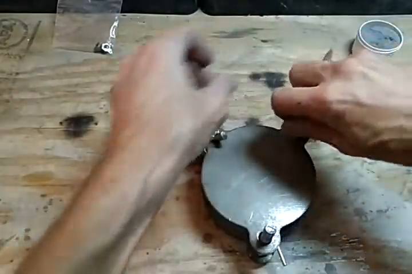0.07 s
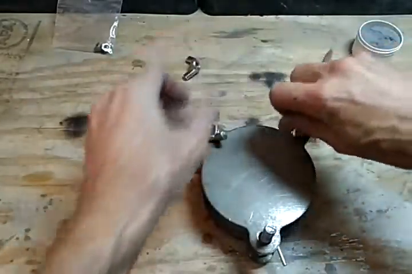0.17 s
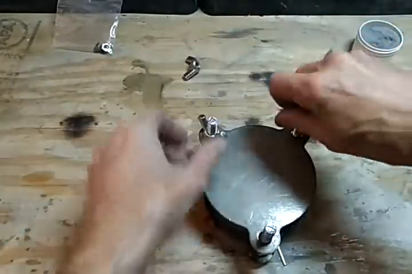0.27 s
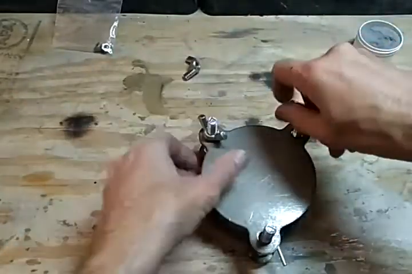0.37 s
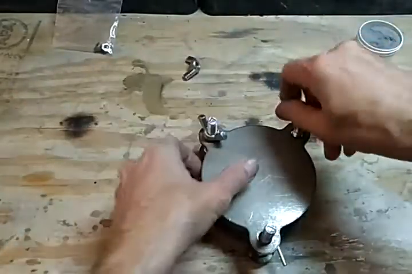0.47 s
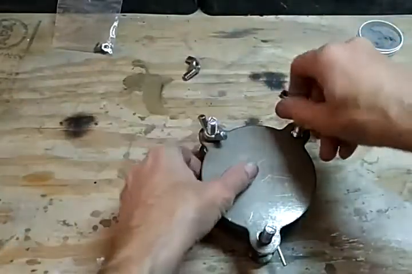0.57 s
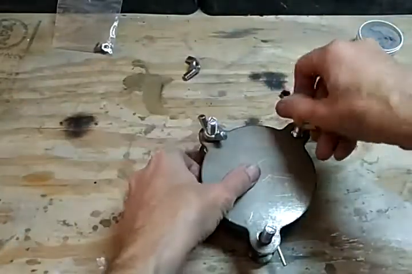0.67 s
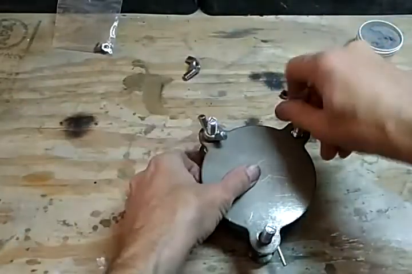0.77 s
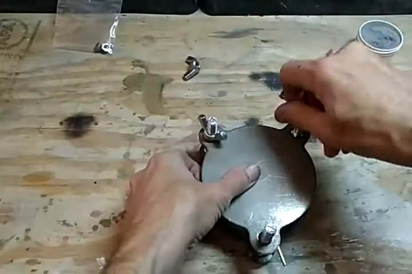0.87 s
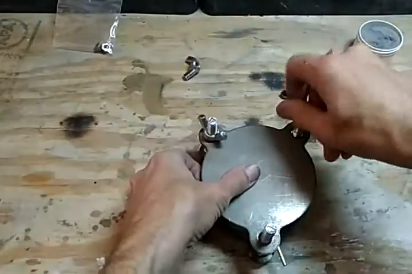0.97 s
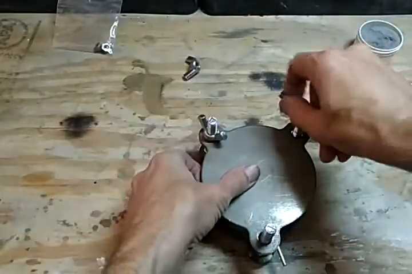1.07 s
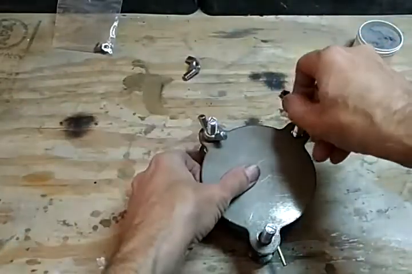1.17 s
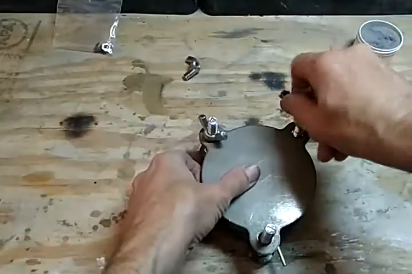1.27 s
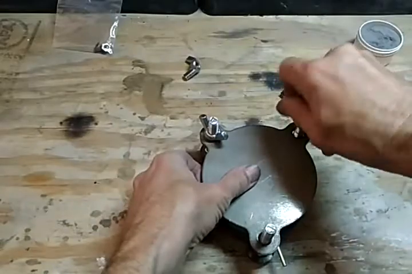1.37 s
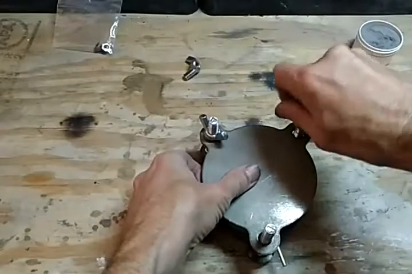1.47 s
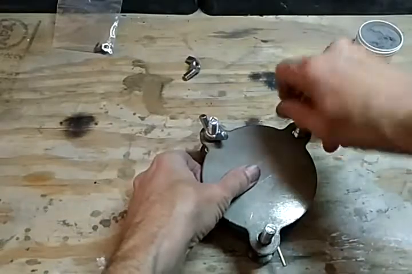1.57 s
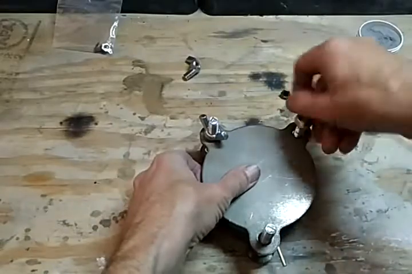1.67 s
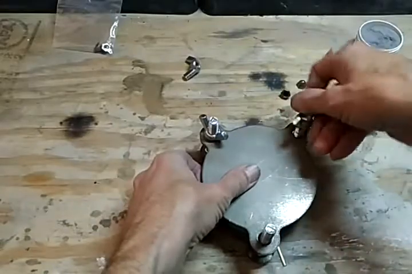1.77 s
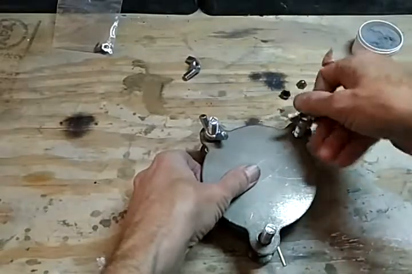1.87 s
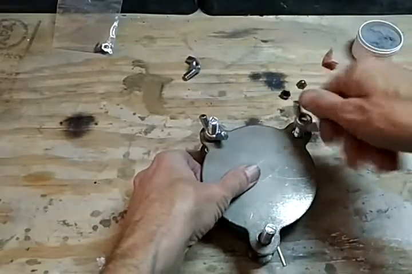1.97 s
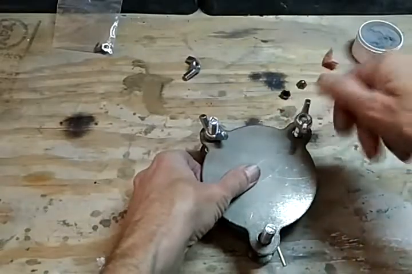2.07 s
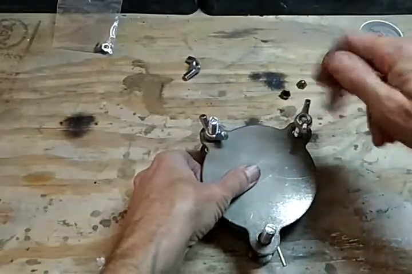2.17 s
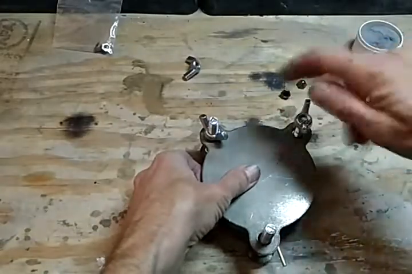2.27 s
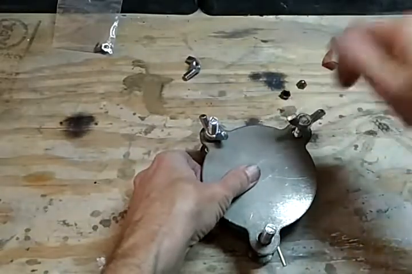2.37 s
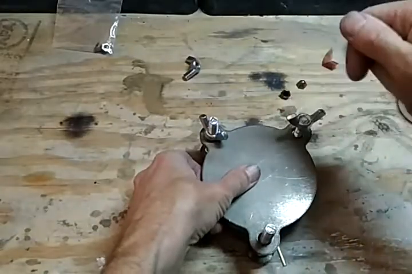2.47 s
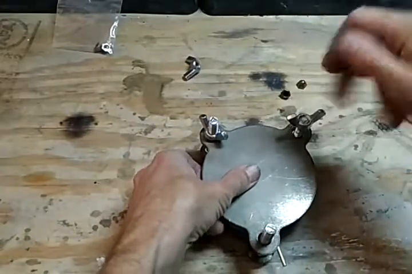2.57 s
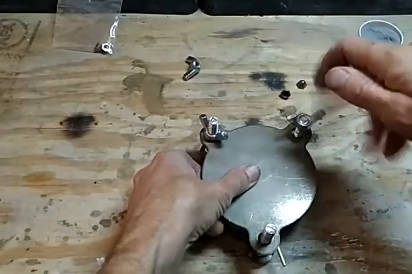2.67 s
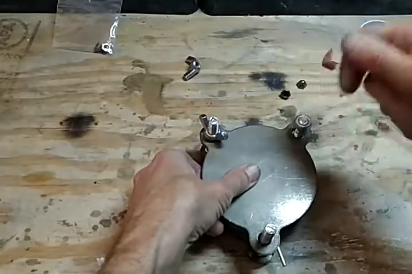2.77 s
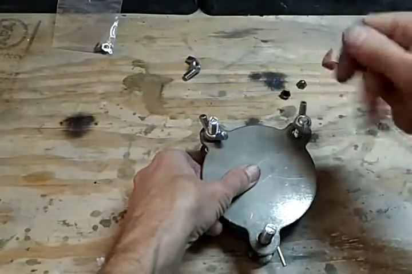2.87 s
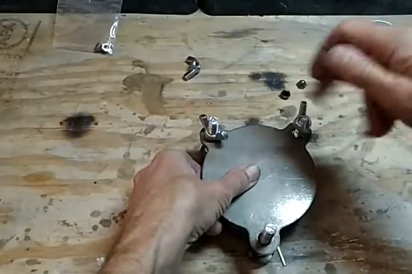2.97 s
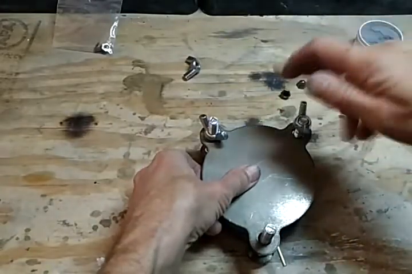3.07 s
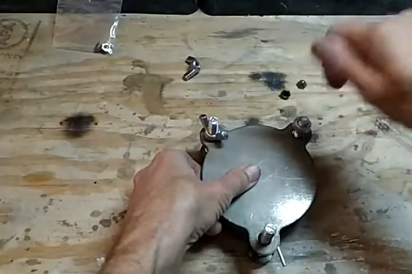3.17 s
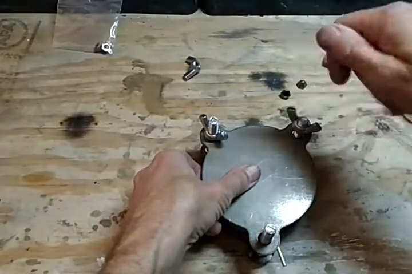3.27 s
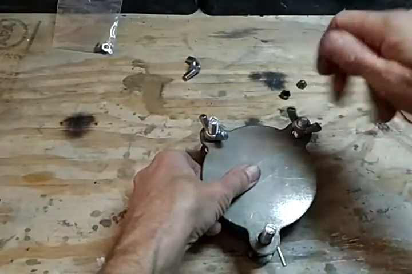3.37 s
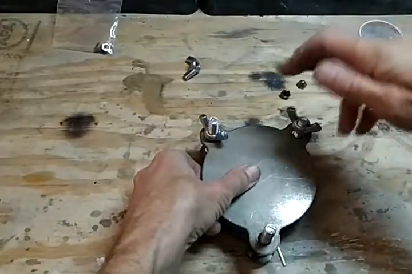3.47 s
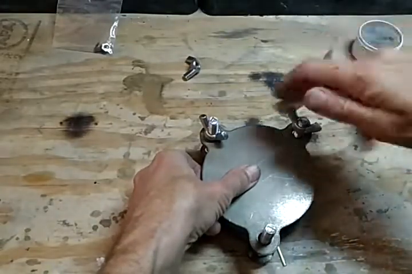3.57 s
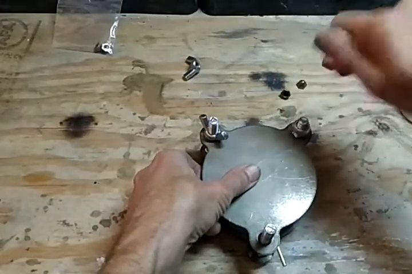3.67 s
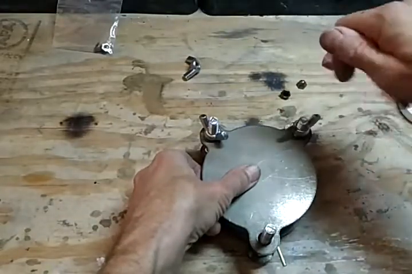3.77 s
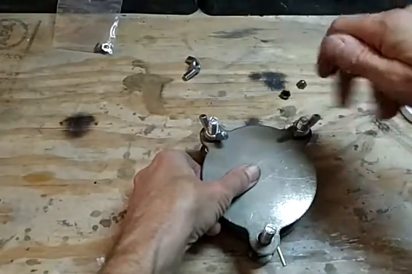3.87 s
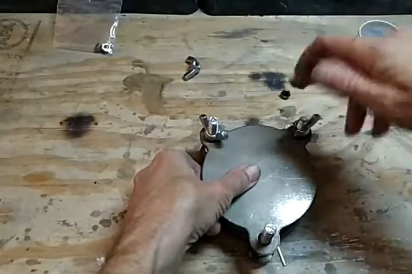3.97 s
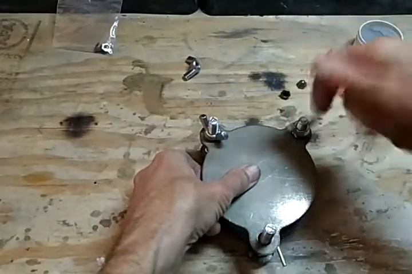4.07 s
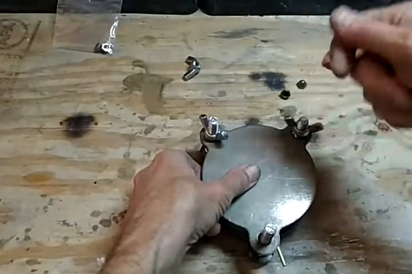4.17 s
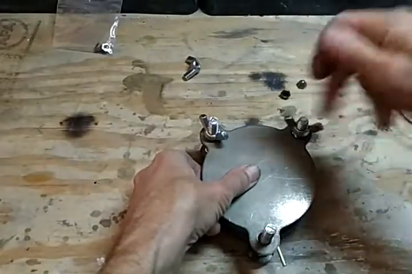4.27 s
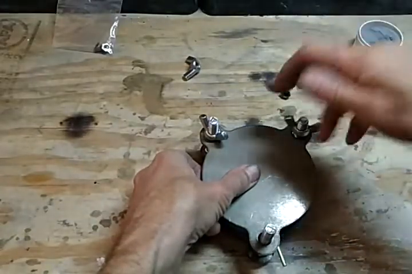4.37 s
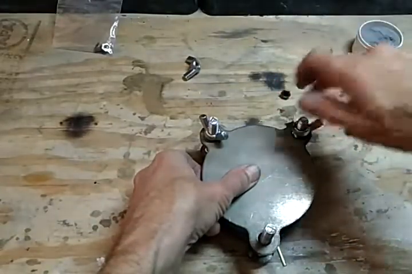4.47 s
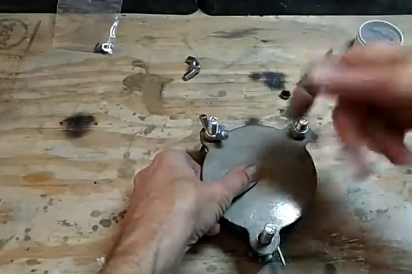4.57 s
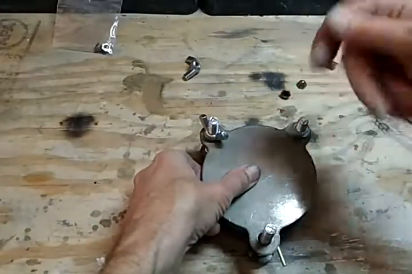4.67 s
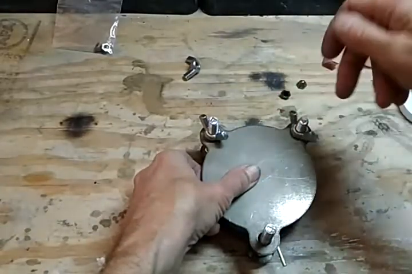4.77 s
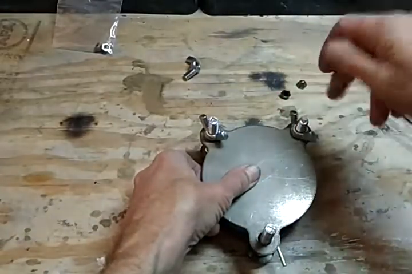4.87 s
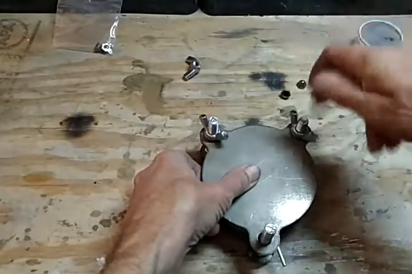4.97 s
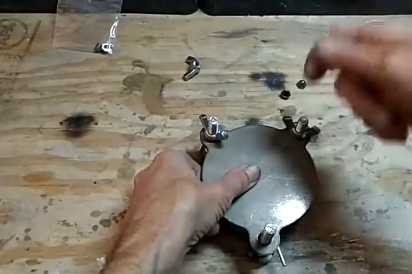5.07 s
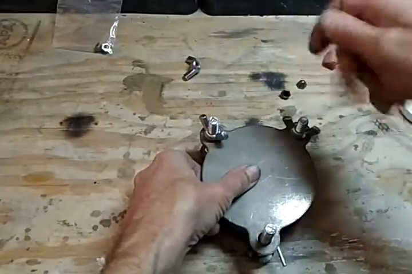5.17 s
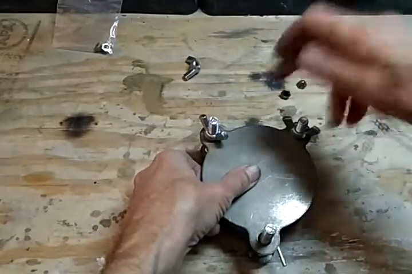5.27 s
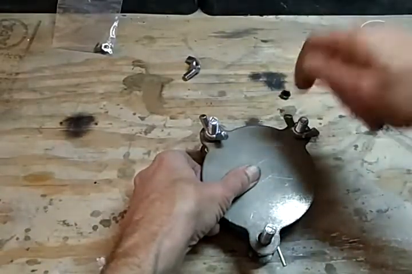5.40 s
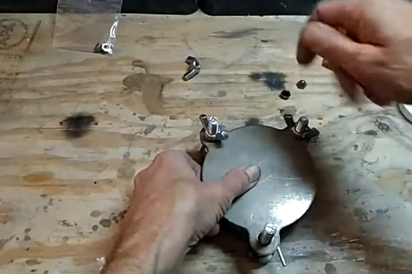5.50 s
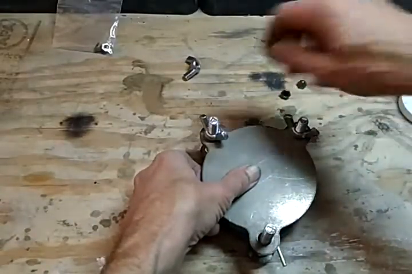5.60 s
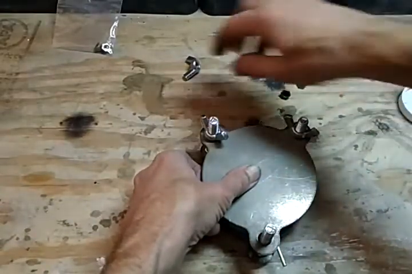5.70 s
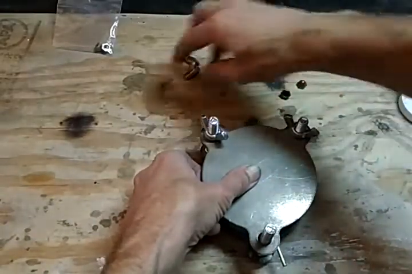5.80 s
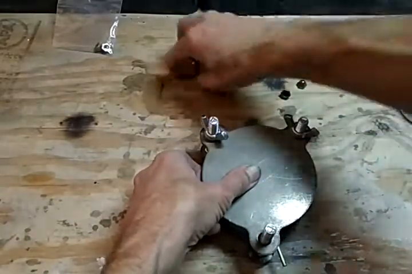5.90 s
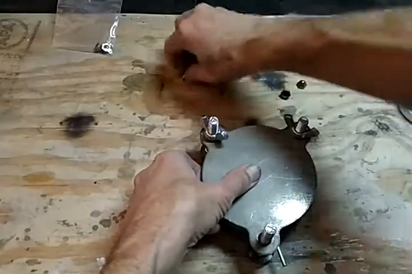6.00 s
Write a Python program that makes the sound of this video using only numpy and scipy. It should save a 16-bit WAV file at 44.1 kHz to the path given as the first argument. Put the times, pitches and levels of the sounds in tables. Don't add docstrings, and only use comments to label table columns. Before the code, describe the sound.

Close-up wing nut work on a bench: dull finger thuds and light metal taps first, then repeated crisp flicks with chattering spins that lurch to a stop in a few hard clinks. The spins weaken, a gap follows, and a nut is grabbed off the plywood with a click and thump. Small dry room, low rumble, soft hiss, phone microphone.

```python
import sys
import numpy as np
from scipy import signal
from scipy.fft import rfft, irfft, next_fast_len
from scipy.io import wavfile
from scipy.ndimage import map_coordinates

SR = 44100
rng = np.random.default_rng(int(sys.argv[2]) if len(sys.argv) > 2 else 0)


def volts_from_decibels(level):
    exponent = np.asarray(level, float) / 20
    return 10 ** exponent


def file_out(sig):
    cols = np.atleast_2d(sig).T
    lim = np.clip(cols, -1, 1)
    pcm = np.round(lim * 32767).astype(np.int16)
    wavfile.write(sys.argv[1], SR, pcm)


N = 266275
SPAN = 16384

# freq_hz, density_db_per_hz
AIR_SPECTRUM = [(15, -70), (39, -22), (63, -6), (230, -14.5), (483, -19), (1220, -23.5), (15200, -36),
                (16500, -44)]
# freq_hz, correlation
AIR_LIKENESS = [(60, 0.62), (180, 0.83), (550, 0.43), (1650, -0.22), (4970, -0.19), (15000, 0.25)]
# freq_hz, rms_db
HUM_LINES = [(59.5, -75), (120, -101), (240, -85), (361, -101), (480, -83.5)]
# pitch_hz, rms_db
SQUEAK_LINES = [(3360, -84.5), (5400, -88.5)]
# time_s, level_db
SQUEAK_SWELL = [(.3, -6), (.45, -1), (.7, 2), (.9, 2), (1.2, 0), (1.4, -19)]
# freq_hz, t60_s
ROOM_T60 = [(150, 0.48), (600, 0.34), (2500, 0.15), (8000, 0.13), (14000, 0.073)]
# freq_hz, left_over_right_db
PORT_SHADOW = [(200, 1), (700, -3), (1300, 0.5), (2400, 0), (4400, 6), (8100, 15.5), (11000, 35.5),
               (15000, -20)]

# freq_hz, width_hz, level_db
STEEL_MODES = [(2270, 220, 0), (3380, 320, -1), (4560, 150, -1), (4880, 190, 7), (5600, 150, -11),
               (6480, 110, -6), (6950, 120, -5), (7440, 110, -5), (7850, 90, -6), (8380, 120, -2),
               (8620, 110, -5), (11300, 120, -10), (12300, 110, 7), (14500, 200, 1)]
# freq_hz, width_hz, level_db
LOOSE_MODES = [(1350, 300, -13), (2150, 300, -11), (3400, 250, -10), (4600, 240, 6), (5900, 300, -9),
               (7400, 400, -6), (8500, 300, -9)]
# freq_hz, width_hz, level_db
PLY_MODES = [(1320, 520, 0), (2360, 720, 0.5), (3260, 240, 1), (5830, 700, -24), (7600, 400, -4.5)]
# freq_hz, width_hz, level_db
PLATE_MODES = [(316.6, 30, 1), (347.4, 50, 3.5), (445.4, 180, -1), (658, 52, -2.5), (822.4, 48.4, 6.5),
               (950, 72, 5), (1296, 356, 2.5), (1579, 500, 0.5), (1998, 147, -6.5)]
# freq_hz, width_hz, level_db
BENCH_MODES = [(85, 225, -10.5), (148.4, 20.5, 9), (183.4, 16, -5.5)]
# freq_hz, level_db
CRACK_SPECTRUM = [(300, -20), (1000, -4), (3900, -5), (5000, -2), (8500, -4), (9900, -10), (10600, -19),
                  (16500, -15)]

# start_s, peak_db, plate_db, bench_db
BUMP_EVENTS = [(0.2832, -41.5, -2.5, -16), (0.4, -51.5, 7.5, -1), (0.5409, -60.5, -12, 3),
               (0.7651, -36.5, -4, -9.5), (0.9597, -43, -4.5, -8.5), (1.054, -42.5, -11, -9),
               (1.2578, -51.5, 10, 7), (1.5982, -49.5, 1.5, -2.5), (1.6642, -35, -22, -10.5),
               (5.3604, -43.5, 3.5, -13), (5.8959, -38, -3.5, 6), (6, -59, -7, 12)]
# start_s, peak_db, plate_db, bench_db
PICKUP_EVENTS = [
    (5.9015, -23.5, -5, -38),
    (5.913, -50, -6, -12),
    (5.925, -36.5, -4, 7),
    (5.951, -35.5, -2, -11),
    (5.966, -41, 5, -21),
]
# start_s, peak_db, plate_db, bench_db
NUDGE_EVENTS = [
    (0.069, -40.5, 11, -31),
    (0.0755, -23, -10, -30),
    (0.379, -50, 6, -10),
    (0.134, -42.5, 5, -6),
    (0.3935, -40, 2, -33),
    (5.0545, -29.5, -10, -13),
    (5.063, -31, -2, -19),
    (5.365, -37, 0.5, -4),
]
# start_s, peak_db, plate_db, bench_db
TAP_EVENTS = [
    (0.074, -29, -10, -18),
    (0.7569, -29.5, -11, -19),
    (1.048, -44, -17.5, -22),
    (1.656, -31, -4.5, -27),
]
# start_s, peak_db, plate_db, bench_db
KNOCK_EVENTS = [(2.3348, -27, -1, -14), (2.344, -24, -3, -7.5), (2.3518, -20, -2.5, -14.5),
                (2.7469, -39, 4, -19), (2.781, -21, -14.5, -17), (2.7974, -18.5, -10.5, -20),
                (2.8665, -32.5, -4, -20), (3.1129, -32, 2, -10), (3.1242, -30, -15.5, -17),
                (3.1548, -24, 1, -19), (3.1667, -35, -18, -6), (3.197, -18, -12, -24),
                (3.2074, -24, 3.5, -9), (3.216, -14, -32, -25), (3.5822, -29, -7, -10),
                (3.6097, -28.5, 3, -11.5), (3.6246, -28, -1, -39), (3.683, -30.5, 2, -13),
                (3.7057, -19, -15.5, -24), (3.7145, -12, -6, -19.5), (3.7236, -12.5, -13, -22.5),
                (3.738, -31, -28, -10), (4.0455, -19.5, -4.5, -32), (4.0598, -15, -9.5, -39),
                (4.0736, -21.5, -13, -17), (4.0828, -25, -5, -27), (4.1311, -35.5, -24, -19),
                (4.6768, -30, -8, -17), (4.6929, -28, -1.5, -22), (4.7244, -33.5, -8, -21)]
# start_s, lurch_s
SPIN_TIMES = [(1.95, 1.998), (2.32, 2.356), (2.7, 2.8), (3.115, 3.163), (3.18, 3.218), (3.59, 3.723),
              (4.045, 4.068), (4.53, 4.685), (4.62, 4.662), (4.7, 4.724), (5.02, 5.066)]
# drag_db, lurch_db, plate_db
SPIN_LEVELS = [(-68.5, -60, 7), (-43.5, -35, -6.5), (-45.5, -32.5, 3.5), (-47, -36.5, 3.5),
               (-55, -31.5, -1.5), (-50.5, -28.5, 4), (-38, -26.5, 1), (-55, -47.5, 11.5),
               (-67, -45.5, 3.5), (-67, -62, 14), (-56.5, -48.5, 8)]
# start_s, peak_db, plate_db, bench_db
FLICK_EVENTS = [
    (1.918, -33.5, -9.5, -23),
    (1.9428, -28.5, -7.5, -23.5),
    (2.3094, -18, -8.5, -26),
    (2.689, -14.5, -11.5, -24),
    (4.0368, -12.5, -9, -27),
    (4.4114, -35, 0.5, -16.5),
    (4.524, -21.5, -19.5, -23),
    (5.01, -25.5, -7, -27),
]

SHARP_DB, BLUNT_DB = 19, 3


def along(points, hz):
    f, v = np.transpose(points)
    return np.interp(np.log(hz + 1), np.log(f + 1), v)


def unit(x):
    return x / np.sqrt(np.mean(np.abs(x) ** 2) + 1e-20)


def resonances(modes, hz, scatter_db):
    total = 0
    for k, (centre_hz, width_hz, db) in enumerate(modes):
        gain = (-1) ** k * volts_from_decibels(db + scatter_db * rng.standard_normal())
        damping = 1j * hz * width_hz
        total = total + gain * damping / (centre_hz * centre_hz - hz * hz + damping)
    return total


def causal(points, hz):
    cep = irfft(np.log(volts_from_decibels(along(points, hz)) + 1e-6))
    cep[1:len(cep) // 2] *= 2
    cep[len(cep) // 2 + 1:] = 0
    return np.exp(rfft(cep))


def impacts(size, share, spread_db):
    chance, side, strength = rng.random((3, size))
    heights = volts_from_decibels(-spread_db * np.log(strength + 1e-4))
    return unit((chance < share) * np.sign(side - .5) * heights)


def air():
    size = next_fast_len(N)
    hz, t = np.fft.rfftfreq(size, 1 / SR), np.arange(N) / SR
    turn = np.arccos(np.clip(along(AIR_LIKENESS, hz), -1, 1)) / 2
    shape = volts_from_decibels(along(AIR_SPECTRUM, hz)) * (hz < 15700)
    noise = rfft(rng.standard_normal((2, size))) * shape * [np.cos(turn), np.sin(turn)]
    mid, side = irfft(noise, size)[:, :N]
    drift = map_coordinates(rng.standard_normal(40), [t * 5])
    hum = sum(volts_from_decibels(db + 7.0 + 2.0 * drift) * np.sin(2 * np.pi * f * t) for f, db in HUM_LINES)
    return volts_from_decibels(-61 - 2.24) * unit(np.array([mid + side, mid - side])) + hum


def squeak():
    t, lines = np.arange(N) / SR, np.zeros(N)
    for pitch_hz, db in SQUEAK_LINES:
        level_waver, phase_waver = [map_coordinates(rng.standard_normal(400), [t * 40]) for _ in range(2)]
        lines += volts_from_decibels(db + 1.5 + 4 * level_waver) * np.sin(2 * np.pi * pitch_hz * t + 1.5 * phase_waver)
    return volts_from_decibels(np.interp(t, *np.transpose(SQUEAK_SWELL))) * lines


def shop(x, mono_hz):
    out, step = np.zeros((2, N + SR)), SR // 4
    for a in range(0, N, step):
        hz, t, z = signal.stft(rng.standard_normal((2, SR // 2)), SR, nperseg=256)
        apart = (hz / (hz + mono_hz))[:, None]
        z = np.array([z[0] + apart * z[1], z[0] - apart * z[1]])
        decay = volts_from_decibels(-60 * t / along(ROOM_T60, hz)[:, None])
        tail = signal.istft(z * decay, SR, nperseg=256)[1]
        wet = signal.fftconvolve(x[None, a:a + step], tail / np.linalg.norm(tail[0]), axes=1)
        out[:, a + 200:a + 200 + wet.shape[1]] += wet
    return out[:, :N]


def ports(x, lag_s):
    out, step = np.zeros((2, N + 2 * SPAN)), SPAN // 4
    hz = np.fft.rfftfreq(SPAN, 1 / SR)
    lift = causal([(f, db / 2) for f, db in PORT_SHADOW], hz)
    shade = np.array([lift, np.exp(-2j * np.pi * hz * lag_s) / lift])
    treble = 1j * hz / (1j * hz + 900)
    for a in range(0, N, step):
        delays_s, signs = rng.uniform(.0001, .003, (6, 2, 1)), rng.choice([-1, 1], (6, 2, 1))
        echoes = np.sum(signs * np.exp(-2j * np.pi * hz * delays_s), axis=0)
        bounce = volts_from_decibels(-11.0) * echoes * treble
        out[:, a:a + SPAN] += irfft(rfft(x[a:a + step], SPAN) * shade * (1 + bounce), SPAN)
    return out[:, :N]


def bodies(force, modes, treble_db, soft_db, crack_db, top_db, scatter_db):
    size = next_fast_len(len(force), True)
    hz = np.fft.rfftfreq(size, 1 / SR)
    part = unit(resonances(modes, hz, scatter_db)) + volts_from_decibels(crack_db) * unit(causal(CRACK_SPECTRUM, hz))
    knee = [(2000, -treble_db), (9400, treble_db), (10500, treble_db + top_db)]
    softness = causal([(400, soft_db), (1600, -soft_db)], hz)
    plate = resonances(PLATE_MODES, hz, 0.35 * scatter_db) * softness
    bench = resonances(BENCH_MODES, hz, scatter_db / 2) * 1j * hz / (1j * hz + 130)
    pushes = rfft([force, force, np.abs(force)], size)
    rings = irfft(pushes * [part * causal(knee, hz), plate, bench], size)[:, :len(force)]
    return rings / np.linalg.norm(rings, axis=1, keepdims=True)


def contacts(table, modes, first_db, share, rise_ms, t60, treble_db, harder, blow_db, levels_db,
             soft_db, crack_db, top_db):
    out, t = np.zeros(N + SPAN), np.arange(SPAN // 2) / SR
    mean_db = np.mean([row[1] for row in table])
    first = np.arange(len(t)) == int(rise_ms * SR / 500) + 1
    swell = 1 - np.exp(-t * 1000 / rise_ms)
    fade = volts_from_decibels(-60 * t / max(t60, .005)) + volts_from_decibels(blow_db - 60 * t / 0.0048)
    for start_s, db, plate_db, bench_db in table:
        hits = impacts(len(t), share, spread_db=3.5) + volts_from_decibels(first_db) * first
        treble = treble_db + harder * (db - mean_db) / 2
        rings = bodies(swell * fade * hits, modes, treble, soft_db, crack_db, top_db, scatter_db=2.5)
        gains = volts_from_decibels(db + np.array([0, plate_db, bench_db]) + levels_db)
        out[round(start_s * SR):][:len(t)] += gains @ rings
    return out[:N]


def bumps():
    return contacts(BUMP_EVENTS, PLY_MODES, BLUNT_DB, share=0.22, rise_ms=0.74, t60=0.043, treble_db=-9,
                    harder=0.11, blow_db=-16, levels_db=[4, 20, 24], soft_db=12.5, crack_db=-13, top_db=-18)


def pickup():
    return contacts(PICKUP_EVENTS, PLY_MODES, BLUNT_DB, share=0.59, rise_ms=0.75, t60=0.056, treble_db=-8,
                    harder=-0.57, blow_db=8, levels_db=[11, 9, 21], soft_db=23, crack_db=-1, top_db=-4)


def nudges():
    return contacts(NUDGE_EVENTS, STEEL_MODES, BLUNT_DB, share=0.36, rise_ms=0.55, t60=0.056, treble_db=-6,
                    harder=-0.37, blow_db=18.5, levels_db=[10.5, 14, 21], soft_db=7.5, crack_db=-6, top_db=-12)


def taps():
    return contacts(TAP_EVENTS, LOOSE_MODES, SHARP_DB, share=0.69, rise_ms=0.13, t60=0.044, treble_db=-9,
                    harder=0.35, blow_db=28, levels_db=[12, 17, 25], soft_db=6.5, crack_db=-10.0, top_db=3)


def knocks():
    return contacts(KNOCK_EVENTS, STEEL_MODES, BLUNT_DB, share=0.11, rise_ms=1.0, t60=0.057, treble_db=-0.5,
                    harder=.6, blow_db=9.5, levels_db=[10.5, 14, 21], soft_db=4.5, crack_db=-6.5, top_db=-19)


def chatter():
    catch_db, catch_s = 5, 0.025
    rise_s, fall_s, fall_db = .018, .028, 17
    stop_s, stop_db = 0.15, 45
    t, level, plate_level = np.arange(N) / SR, np.zeros(N), np.zeros(N)
    for (start, lurch), (drag_db, lurch_db, plate_db) in zip(SPIN_TIMES, SPIN_LEVELS):
        s = [start, start + catch_s, lurch - rise_s, lurch, lurch + fall_s, lurch + stop_s]
        s = np.maximum.accumulate(s)
        db = [drag_db + catch_db, drag_db, drag_db, lurch_db, lurch_db - fall_db, lurch_db - stop_db]
        spin = (t > start) * (t < s[-1]) * volts_from_decibels(np.interp(t, s, db))
        level += spin
        plate_level += spin * volts_from_decibels(plate_db)
    clumps = map_coordinates(rng.standard_normal(N // 200 + 4), [np.arange(N) / 200])
    force = volts_from_decibels(0.73 * clumps) * impacts(N, share=0.025, spread_db=2.5)
    force -= force.mean()
    rings = bodies(force, STEEL_MODES, treble_db=-2.5, soft_db=-2, crack_db=-4, top_db=-16, scatter_db=0)
    steel, plate, _ = np.sqrt(N) * rings
    return volts_from_decibels(-4.5) * (level * steel + volts_from_decibels(-0.5) * plate_level * plate)


def flicks():
    return contacts(FLICK_EVENTS, STEEL_MODES, SHARP_DB, share=0.38, rise_ms=0.013, t60=0.041, treble_db=-0.5,
                    harder=0.39, blow_db=-7, levels_db=[11, 18, 23], soft_db=2.0, crack_db=-4, top_db=-14)


def scene():
    nuts = flicks() + taps() + knocks() + nudges() + bumps() + pickup() + chatter()
    heard = ports(nuts, lag_s=.8 / SR)
    return heard + volts_from_decibels(-8.5) * shop(nuts, mono_hz=533) + air() + squeak()


def roll_off(x):
    return signal.sosfilt(signal.butter(12, 16800, fs=SR, output="sos"), x)


def record(dry):
    band = signal.ellip(10, .5, 80, 16300, fs=SR, output="sos")
    bass_cut = signal.butter(2, 42, "high", fs=SR, output="sos")
    limited = signal.sosfilt(bass_cut, signal.sosfilt(band, dry))
    return roll_off(limited)


dry = scene()
out = record(dry)
file_out(out)
```